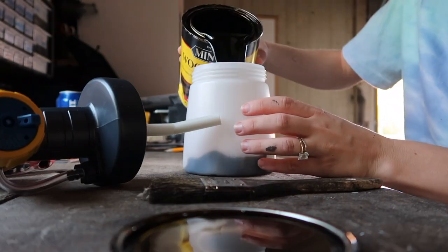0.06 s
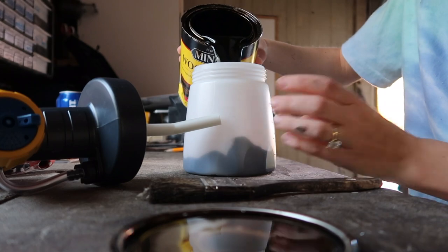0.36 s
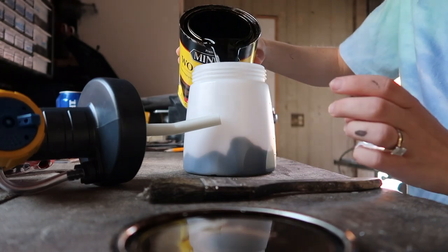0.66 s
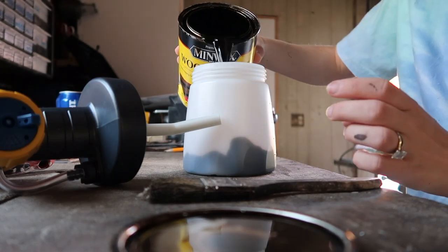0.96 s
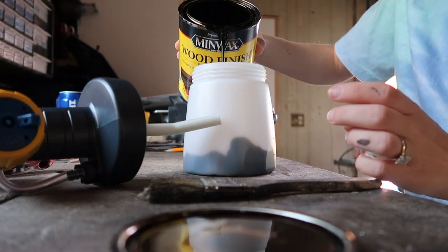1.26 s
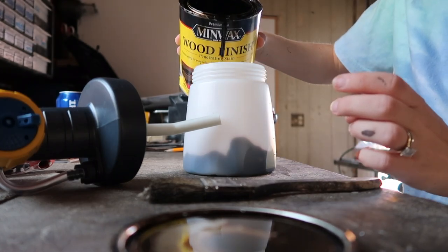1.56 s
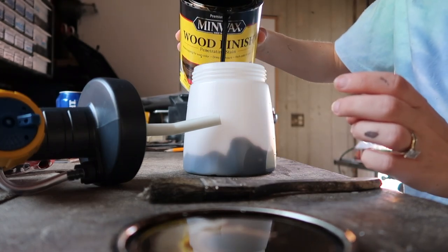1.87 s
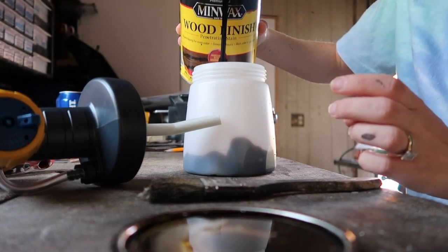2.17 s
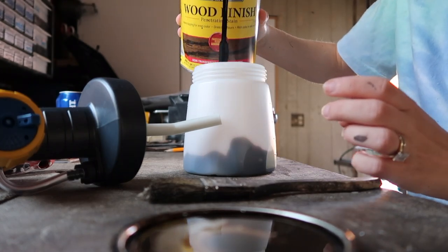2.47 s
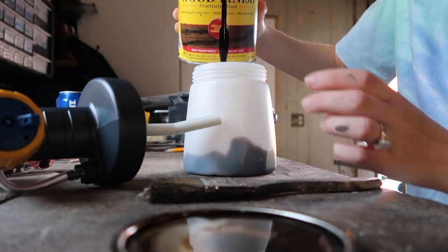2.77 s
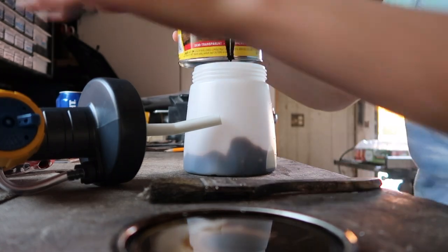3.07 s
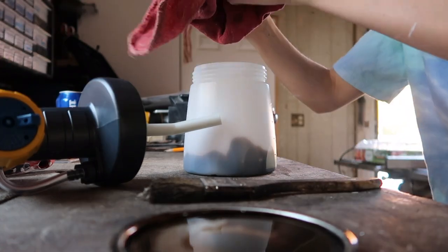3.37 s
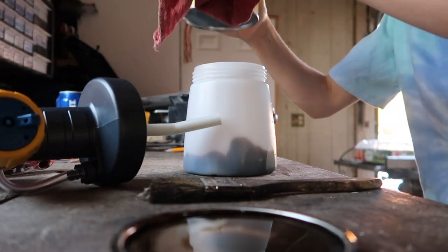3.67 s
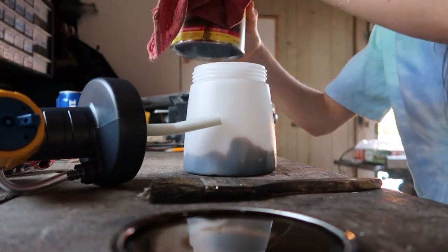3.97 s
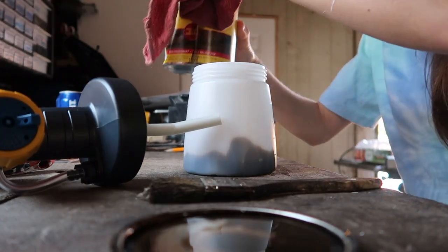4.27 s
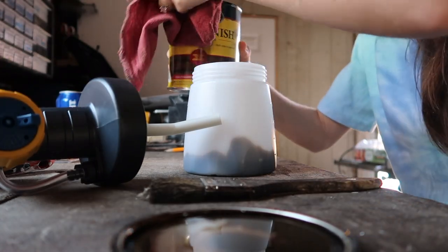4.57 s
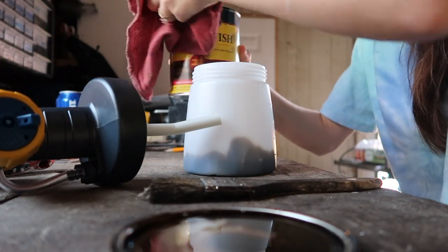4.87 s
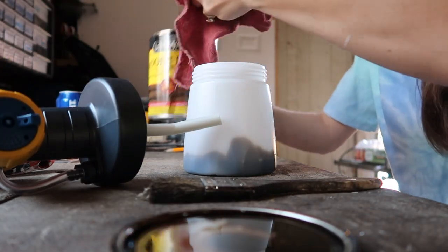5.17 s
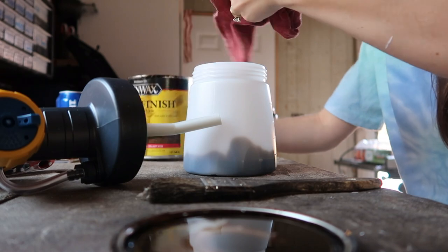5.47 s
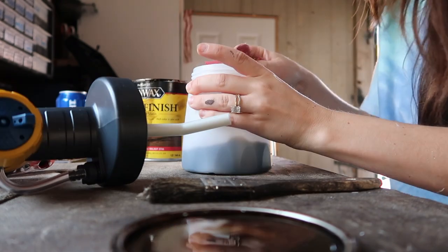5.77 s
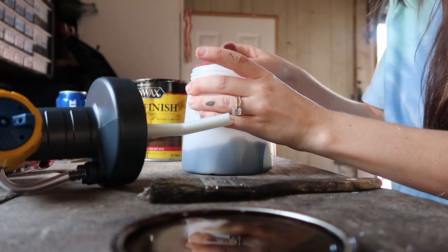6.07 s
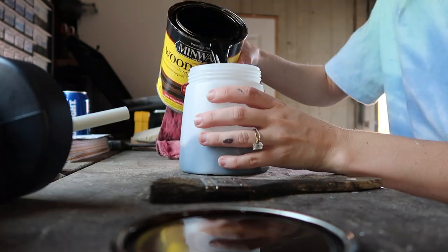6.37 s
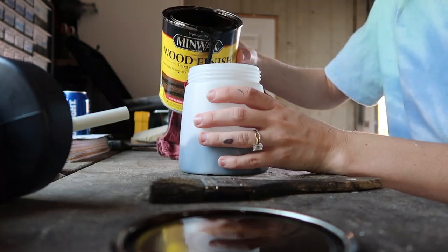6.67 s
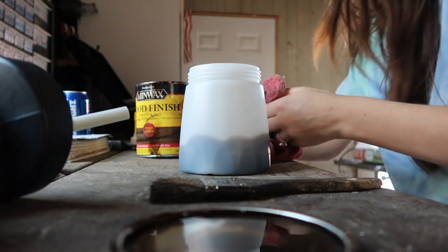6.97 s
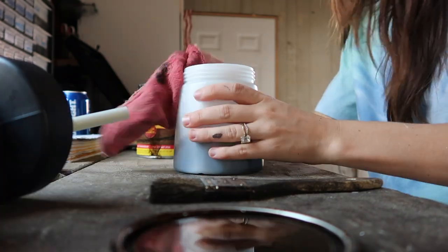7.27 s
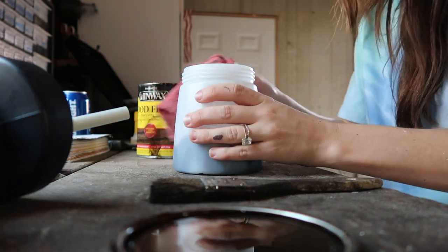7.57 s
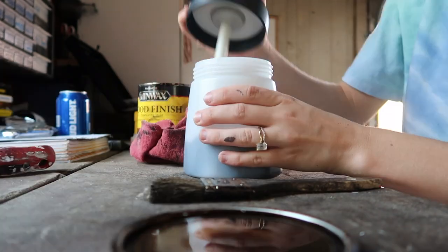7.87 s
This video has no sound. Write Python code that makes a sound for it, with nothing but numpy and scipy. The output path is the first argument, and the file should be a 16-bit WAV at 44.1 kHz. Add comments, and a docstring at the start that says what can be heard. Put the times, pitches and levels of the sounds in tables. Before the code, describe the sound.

Close up in a small, faintly humming workshop, sparse drips, bubbles and plastic ticks mark a very quiet pour into a cup. Soft cloth wiping follows, then a sharp knock of a can on the workbench. A brief, livelier pour bubbles and taps in the cup, things knock down on the bench with a slight rattle, and rag strokes and dull handling rumble finish.

```python
"""Pouring wood stain at a workbench

A small humming workshop, a stereo microphone close to the bench. Stain runs almost silently from a tin
can into a plastic sprayer cup: a few bubbles ring, and taps sound the cup's wall and the air inside.
A rag wipes the can, which is set down with a knock. Time jumps ahead several times: the rag rubs the
cup, a second pour gurgles, the can and the sprayer knock on the bench and set it ringing."""
import sys
import numpy as np
from scipy import signal
from scipy.fft import rfft, irfft, next_fast_len
from scipy.io import wavfile
from scipy.ndimage import map_coordinates

SR = 44100
rng = np.random.default_rng(int(sys.argv[2]) if len(sys.argv) > 2 else 0)


def transcribe(signal):
    """Save signal, clipped to [-1, 1], as a 16-bit WAV file at the path in sys.argv[1]."""
    frames = np.atleast_2d(signal).T
    limited = np.clip(frames, -1, 1)
    pcm = np.round(limited * 32767).astype(np.int16)
    wavfile.write(sys.argv[1], SR, pcm)


N = 353241
TIME = np.arange(N) / SR
AGE = TIME[:SR // 2]   # seconds since a short sound began


def from_db(db):
    """Decibels to gain."""
    return 10 ** (np.asarray(db) / 20)


def rms_one(x):
    """Scale to rms 1."""
    return x / np.sqrt(np.mean(x ** 2) + 1e-20)


def peak_one(x):
    """Scale to peak 1."""
    return x / (np.abs(x).max() + 1e-20)


def at_hz(points, hz):
    """Read (Hz, value) rows on a log-frequency axis."""
    f, value = np.transpose(points)
    return np.interp(np.log(np.maximum(hz, 1)), np.log(f), value)


def cut(x, hz, kind, order=2):
    """Butterworth filter."""
    sos = signal.butter(order, np.clip(hz, 10, .45 * SR), kind, fs=SR, output="sos")
    return signal.sosfilt(sos, x)


def fade(t60):
    """Free decay of a vibration, 60 dB in t60 seconds."""
    return from_db(-60 * AGE / t60)


def burst(t60):
    """A puff of white noise that dies away."""
    return rng.standard_normal(len(AGE)) * fade(t60)


def ring(modes):
    """A struck body of (Hz, dB, t60) modes: every blow gives each mode a strength of its own."""
    strengths = from_db(1.5 * rng.standard_normal(len(modes)))
    return sum(strengths[k] * from_db(db) * fade(t60) * np.sin(2 * np.pi * hz * AGE) * (-1) ** k
               for k, (hz, db, t60) in enumerate(modes))


def dying_noise(rows):
    """Countless close modes: half-octave noise bands from (Hz, dB, t60) rows, each dying at its rate."""
    rows, edges = np.array(rows), 90 * 2 ** np.arange(0, 7.6, .5)
    out, settle = 0, 2048
    for low, high in zip(edges, edges[1:]):
        hz = np.sqrt(low * high)
        band = cut(rng.standard_normal(len(AGE) + settle), [low, high], "band", order=3)[settle:]
        out = out + band * from_db(at_hz(rows[:, :2], hz)) * fade(at_hz(rows[:, ::2], hz))
    return out


def resonate(x, resonances):
    """A sound together with the (Hz, width Hz, dB) resonances that it excites."""
    return x + sum(from_db(db) * signal.lfilter(*signal.iirpeak(hz, hz / width_hz, fs=SR), x)
                   for hz, width_hz, db in resonances)


def drift(rate_hz):
    """A random wander of rms 1."""
    knots = rng.standard_normal(4096)
    return rms_one(map_coordinates(knots, [TIME * rate_hz], order=1, mode="wrap"))


def grains(per_s, spread_db):
    """Clicks at random times, most of them small."""
    size = from_db(spread_db * np.minimum(rng.exponential(1, N), 3)) * rng.choice([-1, 1], N)
    return (rng.random(N) < per_s / SR) * size


# Each entry: a moment in seconds at which time jumps ahead.
TIME_JUMPS = [5.671, 6.172, 6.839, 7.21]


def add(track, s, sound):
    """Mix a short sound into a track at time s; it ends where time next jumps ahead."""
    start = max(round(s * SR), 0)
    end = min([round(jump * SR) for jump in TIME_JUMPS if jump > s] + [N, start + len(sound)])
    track[start:end] += sound[:end - start]


def movements(rows, attack_s, release_s, swell_db):
    """Gain over time for (start, length, dB) rows: each sets in, swells or sags, and dies away."""
    gain = np.zeros(N)
    for start, length, db in rows:
        progress = np.clip((TIME - start) / length, 0, 1)
        held = from_db(db + swell_db * (progress - .5))
        outside = np.maximum(start - TIME, 0) / attack_s + np.maximum(TIME - start - length, 0) / release_s
        same_span = np.searchsorted(TIME_JUMPS, TIME) == np.searchsorted(TIME_JUMPS, start + length / 2)
        gain = np.maximum(gain, held * np.exp(-np.minimum(outside, 20)) * same_span)
    return gain


# Stereo width at the microphone. Each row: frequency in Hz, side minus mid in dB.
STEREO_WIDTH = [(60, -36), (110, -26.5), (200, -14.5), (380, -7.5), (700, -8.5), (1290, -6), (2380, -10.5),
                (4400, -4), (8120, 5), (15000, 13.5)]


def noise(colour):
    """Diffuse stereo noise of a given spectrum, wider in the treble; its middle has rms 1."""
    size = next_fast_len(N)
    hz = np.arange(size // 2 + 1) * SR / size
    mid, side = rfft(rng.standard_normal((2, size))) * from_db(at_hz(colour, hz))
    mid = irfft(mid, size)[:N]
    side = irfft(side * from_db(at_hz(STEREO_WIDTH, hz)), size)[:N]
    return np.array([mid + side, mid - side]) / mid.std()


# Room tone all around the microphone. Each row: frequency in Hz, relative density in dB.
ROOM_COLOUR = [(20, -21), (36, -14), (52, 2.5), (66, 0), (85, -4.5), (200, -8), (350, -13.5), (700, -20),
               (1400, -25), (2900, -25), (5000, -34.5), (8000, -43), (11000, -56.5), (15000, -64.5)]
# The workshop's hum. Each row: frequency in Hz, rms level in dB.
HUM_TONES = [(59.2, -53), (118.4, -51), (199.2, -62.5)]


def room_tone(noise_db=-44.0, waver_db=2.0, wander_rad=0.52):
    """Steady low noise under a hum that wavers in level and phase."""
    out = from_db(noise_db) * noise(ROOM_COLOUR)
    for hz, db in HUM_TONES:
        amplitude = np.sqrt(2) * from_db(db + waver_db * drift(5.6))
        out += amplitude * np.sin(2 * np.pi * hz * TIME + wander_rad * drift(6.4))
    return out


def bubble(hz, t60, rise=0.077, swell_cycles=1.0):
    """A bubble swells within a cycle or so and rings, its pitch rising as it nears the surface."""
    pitch = hz * (1 + rise * np.minimum(AGE / t60, 1))
    swell = 1 - np.exp(-AGE * hz / swell_cycles)
    return peak_one(np.sin(2 * np.pi * np.cumsum(pitch) / SR) * fade(t60) * swell)


def stray_bubbles(flow, per_s=45, low_hz=1078, high_hz=3370, splat_db=-3, count=1024):
    """Rows of lesser bubbles at random, as loud as the flow allows; the faintest are left out."""
    when, pitch = rng.random((2, count))
    over_flow_db = 6.5 + 2.5 * rng.standard_normal(count)
    starts = (np.arange(count) + when) / per_s
    levels = over_flow_db + 20 * np.log10(np.interp(starts, TIME, flow, right=0) + 1e-9)
    pitches = low_hz * (high_hz / low_hz) ** pitch
    return [(s, db, hz, splat_db) for s, db, hz in zip(starts, levels, pitches) if db > -56]


def in_cup(x, bounce_db, bounce_t60):
    """Sound made inside the cup bounces between its walls on the way to the microphone."""
    response = from_db(bounce_db) * burst(bounce_t60)
    response[0] = 1
    return signal.fftconvolve(x, response)[:N] / np.sqrt(np.sum(response ** 2))


# Bubbles that stand out, down in the cup; the row at 1.573 s is instead a bright 3 kHz ping as the can's rim
# touches the cup. Each row: start in seconds, level in dB, pitch in Hz, splat against the bubble in dB.
CLEAR_BUBBLES = [(0.1533, -35.5, 1540, -8), (.226, -44, 790, -2), (0.2855, -30.5, 3720, -7),
                 (.287, -40, 935, -8), (0.354, -37, 1920, 5.5), (0.382, -18.5, 3240, -8.5),
                 (.466, -38, 3680, -7), (.485, -34, 1810, -2), (0.49, -33.5, 3020, -9),
                 (.569, -43, 2200, 1), (.59, -44, 3370, -9), (.6317, -40.5, 884, 2.5),
                 (1.2124, -34.5, 4370, -7), (1.573, -24, 3020, -8), (1.593, -44, 1460, -7),
                 (1.662, -44, 4200, 2), (2.463, -25.5, 1537, 1), (2.56, -36, 1600, -8),
                 (2.572, -36.5, 1600, -2), (3.2692, -25.5, 804, -15), (6.215, -36, 1960, -4.5),
                 (6.258, -44, 4230, 6), (6.272, -25.5, 2030, -9), (6.273, -31.5, 2900, -4),
                 (6.312, -43, 3200, -2), (6.324, -43, 4000, 1), (6.358, -41, 2400, -2),
                 (6.371, -35, 1360, 1.5), (6.39, -33.5, 1970, -9), (6.397, -42, 3830, -6),
                 (6.42, -31, 4000, -8), (6.435, -24.5, 4770, -2), (6.441, -37, 4800, -1),
                 (6.467, -27.5, 1900, -15), (6.475, -37, 4150, -3), (6.488, -36, 3730, -9),
                 (6.507, -32, 2070, -8), (6.543, -32, 3450, -8), (6.553, -37, 3200, -7),
                 (6.554, -35.5, 1930, -1), (6.568, -43, 3900, -2), (6.579, -40, 2250, -10),
                 (6.593, -39, 2200, -7), (6.611, -33.5, 2100, -6), (6.637, -35, 1780, -5),
                 (6.666, -36, 3170, -7), (6.672, -29, 1620, 1), (6.68, -33, 1470, -7),
                 (6.691, -43, 3490, -2), (6.692, -34, 1500, -4)]


def bubbles(flow, t60_at_1khz=0.043, splat_t60=0.034):
    """Single bubbles, each born with a wet splat; the higher ones die sooner."""
    out = np.zeros(N)
    for s, db, hz, splat_db in CLEAR_BUBBLES + stray_bubbles(flow):
        t60 = t60_at_1khz * (1000 / hz) ** 0.42
        splat = peak_one(cut(burst(splat_t60), [hz * 0.53, hz * 1.15], "band", order=3))
        add(out, s, from_db(db) * (bubble(hz, t60) + from_db(splat_db) * splat))
    return in_cup(out, bounce_db=-26.0, bounce_t60=.028)


def fizz(ring_cycles=18):
    """Tiny bubbles burst at random; the smaller they are, the higher and shorter they ring."""
    out, pitches = np.zeros(N), np.geomspace(1350, 4600, 32)
    pops = grains(per_s=600, spread_db=8.5)
    pitch_index = rng.integers(0, len(pitches), N)
    for k, hz in enumerate(pitches):
        radius, angle = from_db(-60 * hz / (ring_cycles * SR)), 2 * np.pi * hz / SR
        resonator = [0, np.sin(angle)], [1, -2 * radius * np.cos(angle), radius ** 2]
        out += np.sqrt(hz) * signal.lfilter(*resonator, pops * (pitch_index == k) + 1e-18)
    return rms_one(cut(out, 4600, "low"))


def crackle():
    """Thin films of stain snap, each within a cycle or two."""
    return rms_one(cut(grains(per_s=400, spread_db=9.5), [1200, 4600], "band", order=3))


# Runs of stain into the cup, at close range. Each row: start and length in seconds, level in dB.
STAIN_RUNS = [(.24, 0.21, -62), (.458, 0.053, -48.5), (.53, 0.066, -54.5), (1.15, 0.6, -61),
              (2.15, 0.36, -60), (6.28, 0.11, -47.5), (6.415, 0.079, -46), (6.545, 0.14, -51.5)]
# The cup colours the stream. Each row: centre and width in Hz, gain in dB.
STREAM_RESONANCES = [(1500, 220, 6), (2100, 140, 3), (3150, 200, -4.5), (4000, 350, -7)]


def pour(crackle_db=-1):
    """The stream fizzes, crackles and sheds single bubbles, all inside the cup."""
    flow = movements(STAIN_RUNS, attack_s=0.011, release_s=0.034, swell_db=-1)
    froth = resonate(fizz() + from_db(crackle_db) * crackle(), STREAM_RESONANCES)
    stream = flow * rms_one(in_cup(froth, bounce_db=-20.5, bounce_t60=0.042))
    return stream + bubbles(flow)


# The air in the empty cup. Each row: frequency in Hz, level in dB, t60 in seconds.
CUP_AIR_MODES = [(541.5, 5, 0.11), (618, 2, 0.052), (649, -1.5, 0.072)]


def air_note(s, rise_per_s=0.013):
    """The cup's hollow note at time s; it climbs steadily over the scene, as in a filling cup."""
    return ring([(hz * (1 + rise_per_s * s), level, t60) for hz, level, t60 in CUP_AIR_MODES])


# The cup's plastic wall and its base. Each row: frequency in Hz, level in dB, t60 in seconds.
CUP_WALL_MODES = [(795, 1.5, 0.047), (970, 11.5, 0.0091), (1302, 2.5, 0.065), (1600, -1.5, 0.098),
                  (2057, 0.5, 0.076), (2460, -7, 0.024), (3100, 4.5, 0.046), (3680, 7, 0.043),
                  (4310, 6.5, 0.048), (5000, 4, 0.032), (5700, -22, 0.036)]
CUP_BASE_MODES = [(198.4, -4.5, 0.16), (331, -3, 0.094), (480, -4, 0.039)]
# The can's rim or a slug of stain strikes the cup, near the microphone.
# Each row: start in seconds, peak in dB, brightness in Hz, thump and air note gains in dB.
CUP_TAPS = [(0.3544, -33, 6000, -10, -13), (0.4547, -30, 7040, -23, -31), (1.5729, -27, 2400, -16, -10.5),
            (1.594, -35, 3000, -28, -30), (2.4624, -20, 2300, -2.5, -18), (2.558, -25.5, 1700, 4.5, -10),
            (2.745, -36.5, 1500, -7, -12), (3.262, -30, 2000, -3.5, -9), (6.4138, -23, 2580, -39, -14),
            (6.434, -25.5, 4600, -27, -26), (6.456, -17.5, 1600, -48, -9), (6.476, -26.5, 2030, -34, 2),
            (6.636, -30.5, 1600, -22, -8), (6.669, -31, 2000, -28, -11), (6.692, -32, 2000, -24, -9)]


def cup_taps(crack_db=11.0, crack_t60=0.084):
    """Each blow cracks and rings the plastic wall at its own brightness, and sounds the air and base."""
    out = np.zeros(N)
    for s, db, bright_hz, thump_db, air_db in CUP_TAPS:
        hiss = cut(rng.standard_normal(len(AGE)), [350, 6500], "band")
        crack = from_db(crack_db) * hiss * fade(crack_t60)
        wall = peak_one(cut(ring(CUP_WALL_MODES) + crack, bright_hz, "low"))
        hollow = from_db(air_db) * air_note(s)
        thump = from_db(thump_db) * ring(CUP_BASE_MODES)
        add(out, s, from_db(db) * peak_one(wall + hollow + thump))
    return out


# Dry ticks and wet snaps, close by. Each row: start in seconds, peak in dB, low and high edge in Hz.
SNAPS = [(.3548, -39.5, 6000, 12400), (.4565, -34, 3200, 6130), (0.4595, -29.5, 3500, 5900),
         (1.574, -20.5, 1100, 3600), (2.4635, -30.5, 3600, 4840), (2.625, -39, 8000, 13100),
         (3.153, -40.5, 8040, 13000), (3.2619, -18.5, 1600, 5340), (3.2624, -24, 4900, 5700),
         (3.2617, -38, 7000, 12000), (3.2653, -21, 1830, 5700), (3.27, -25.5, 1500, 4230),
         (3.2935, -36, 3500, 5950), (3.3327, -30, 1790, 5000), (6.4559, -13.5, 690, 1750),
         (7.1287, -21.5, 1670, 2950)]


def ticks(t60=0.0053):
    """Each snap is a few milliseconds of noise in one band."""
    out = np.zeros(N)
    for s, db, low_hz, high_hz in SNAPS:
        add(out, s, from_db(db) * peak_one(cut(burst(t60), [low_hz, high_hz], "band", order=5)))
    return out


# The can's rim. Each row: frequency in Hz, level in dB, t60 in seconds.
RIM_MODES = [(1400, -10, .1), (2131, -9, .14), (2930, -4, 0.22), (3060, -3, 0.18), (3160, 1, .08),
             (3876, -5, .1)]
# The rim touches the cup. Each row: start in seconds, peak in dB.
RIM_PINGS = [(1.5733, -32), (2.4635, -42)]


def rim_pings():
    """The thin metal rim rings on after a touch."""
    out = np.zeros(N)
    for s, db in RIM_PINGS:
        add(out, s, from_db(db) * peak_one(ring(RIM_MODES)))
    return out


# Hands at work near the microphone. Each row: start and length in seconds, level in dB.
HAND_MOVES = [(1.92, 0.096, -45), (2.38, 0.72, -44.5), (5.87, 0.24, -48.5), (6.85, 0.13, -38),
              (7.268, 0.05, -35), (7.56, 0.28, -43), (7.81, 0.22, -38.5)]
# Their rumble. Each row: frequency in Hz, relative density in dB.
HANDLING_COLOUR = [(30, -3.5), (70, 4.5), (130, 12), (200, -2.5), (300, -7), (600, -29), (1200, -32.5),
                   (3000, -67)]


def handling():
    """Hands and arms shift things on the bench with a dull rumble."""
    return movements(HAND_MOVES, attack_s=0.025, release_s=0.02, swell_db=0) * noise(HANDLING_COLOUR)


# Big gulps of air at the cup.
# Each row: start in seconds, level in dB, pitch in Hz, t60 in seconds, relative after-ring in dB.
GULPS = [(2.4625, -19, 586, 0.036, -9), (2.483, -32, 628, .04, -20), (2.513, -37, 557, .06, -7),
         (2.559, -30.5, 590, 0.05, -12), (5.858, -29, 530, 0.06, -23), (6.2326, -18, 576, 0.039, -18)]


def glugs(splat_db=-16, splat_t60=0.055):
    """A big bubble gulps and leaves the air in the cup ringing."""
    out = np.zeros(N)
    for s, db, hz, t60, after_db in GULPS:
        splat = from_db(splat_db) * peak_one(cut(burst(splat_t60), [350, 1100], "band"))
        gulp = bubble(hz, t60, rise=0.032, swell_cycles=1.6)
        hollow = from_db(after_db) * peak_one(air_note(s))
        add(out, s, from_db(db) * (gulp + hollow + splat))
    return out


def wandering_band(x, hz, width_hz, wander_share=0.026, block=512):
    """One band of a sound; its centre drifts, stepped block by block."""
    centre = hz * (1 + wander_share * drift(14))
    out, state = np.zeros_like(x), np.zeros((2, 2))
    for i in range(0, N, block):
        peak = signal.iirpeak(centre[i], hz / width_hz, fs=SR)
        out[:, i:i + block], state = signal.lfilter(*peak, x[:, i:i + block], zi=state)
    return out


# The hiss of cloth from close up. Each row: frequency in Hz, relative density in dB.
CLOTH_COLOUR = [(200, -6), (500, 1.5), (1100, -4.5), (1750, -4), (2300, -3.5), (2900, -4.5), (4000, -4),
                (5300, -10), (8500, -21), (11000, -36), (15000, -35)]


def rub(strokes, bands, catch_db, uneven_db):
    """Cloth drags under uneven pressure with a hiss and catching fibres; wandering bands stand out."""
    rasp = rms_one(cut(grains(per_s=800, spread_db=7.5), [2500, 5000], "band"))
    friction = from_db(uneven_db * drift(35)) * (noise(CLOTH_COLOUR) + from_db(catch_db) * rasp)
    out = friction + sum(from_db(db) * wandering_band(friction, hz, width_hz)
                         for hz, width_hz, db in bands)
    # the hand presses harder through each stroke
    pressure = movements(strokes, attack_s=0.011, release_s=0.03, swell_db=3)
    return pressure * out / out.mean(axis=0).std()


# Rag strokes, close and dry. Each row: start and length in seconds, level in dB.
CAN_STROKES = [(3.57, 0.364, -53), (3.98, 1.1, -57)]
CUP_STROKES = [(5.672, 0.12, -43.5), (5.88, 0.09, -45), (6.065, 0.14, -43.5), (7.255, 0.028, -45),
               (7.34, 0.17, -51), (7.49, 0.18, -47.5), (7.72, 0.25, -57)]
# Resonances that rubbing brings out and the grip shifts, plus a faint sheen of hiss near 14 kHz
# in the cup strokes. Each row: centre and width in Hz, gain in dB.
CAN_RUB_BANDS = [(2330, 150, 10.5), (3450, 160, 2), (4620, 370, 0.5)]
CUP_RUB_BANDS = [(1310, 91, 2), (1620, 130, 10.5), (1750, 130, 10), (2200, 170, 10), (3530, 340, 6),
                 (4320, 160, 4), (5960, 70, 0), (13900, 1400, -1)]


def rag():
    """The rag wipes the can softly, later scrubs the cup."""
    wipe = rub(CAN_STROKES, CAN_RUB_BANDS, catch_db=-20, uneven_db=2.0)
    scrub = rub(CUP_STROKES, CUP_RUB_BANDS, catch_db=-10, uneven_db=1.1)
    return wipe + scrub


# The bench, the can, and the bench's dense modes with the tools on it.
# Each row: frequency in Hz, level in dB, t60 in seconds.
BENCH_MODES = [(161, -1.5, 0.22), (224, -9, 0.28), (352.4, -1.5, .3), (391.4, -0.5, .2), (522, -8, 0.35),
               (554, -9.5, 0.15), (590, -4, .23), (652, -2.5, .21), (675, -4.5, .15), (727, -8, 0.23),
               (778, -5.5, 0.23), (877, -3, .14), (1120, -10, 0.24)]
CAN_MODES = [(1020, -13.5, 0.2), (1180, 6.5, .12), (1350, -1, 0.1), (1520, -10, 0.12), (1680, -1.5, 0.22),
             (1830, -5, 0.17), (2000, -10.5, 0.22), (2240, -4, 0.33), (2290, -12, 0.24), (2400, -6, 0.26)]
RATTLE_BANDS = [(128, -9, 0.18), (261, -9, 0.42), (525, -2.5, 0.14), (705, 2.5, 0.096), (1070, -5, 0.22),
                (1600, -14, 0.2), (2400, -26.5, 0.077), (3200, -47, .12), (5900, -62.5, 0.056)]
# Things put down near the microphone. Each row: start in seconds, level in dB, thud pitch in Hz, its
# t60 in seconds, bench ring in dB, its tilt in dB per octave, rattle and can ring gains in dB.
BENCH_KNOCKS = [(5.571, 3, 647, 0.0075, -24, -0.5, -27.5, -43.5),
                (6.91, 3.5, 660, 0.0076, -23.5, -0.5, -24, -43.5),
                (6.9535, -12, 423, 0.0048, -27, 0, -35, -47), (6.9888, -23, 700, 0.0056, -27, 0, -28, -36),
                (7.1279, -10, 1310, 0.013, -18.5, -1.5, -18, -28)]


def knocks(rattle_boost_db=20.0, overtone_db=-17, build_s=0.00042):
    """A short thud rings the bench, the can and loose tools; where it lands tilts the bench's modes."""
    out = np.zeros(N)
    for s, db, hz, t60, ring_db, tilt_db, tools_db, can_db in BENCH_KNOCKS:
        # the blow is two damped tones of steady pitch
        blow = bubble(hz, t60, rise=0) + from_db(overtone_db) * bubble(1.794 * hz, t60=0.022, rise=0)
        thud = cut(cut(blow, 2000, "low", order=4), 130, "high")
        modes = [(f, level + tilt_db * np.log2(f / 500), ring_s) for f, level, ring_s in BENCH_MODES]
        bench = from_db(ring_db) * ring(modes)
        rattle = from_db(rattle_boost_db + tools_db) * dying_noise(RATTLE_BANDS)
        can = from_db(can_db) * ring(CAN_MODES)
        build_up = 1 - np.exp(-AGE / build_s)
        add(out, s, from_db(db) * (thud + (bench + rattle + can) * build_up))
    return out


# Friction on the bench top. Each row: frequency in Hz, relative density in dB.
SLIDE_COLOUR = [(60, -29), (170, 7.5), (280, 0), (550, -4.5), (1000, -6), (1700, -6.5), (2300, -7),
                (2900, -9.5), (4500, -13), (8000, -48), (15000, -62)]
# The sliding cup. Each row: centre and width in Hz, gain in dB.
SLIDE_RESONANCES = [(239, 37, 2.5), (480, 100, -3), (690, 85, 1.5), (1297, 92, 6.5), (1734, 95, 8),
                    (2186, 86, 6), (2280, 98, 6)]
# Things shoved along the bench, close by.
# Each row: time in seconds, peak in dB, build-up and fade in seconds, brightness in Hz, boom in dB.
SHOVES = [(5.8905, -17, 0.003, 0.0087, 2100, -41), (7.269, -13.5, 0.0042, 0.011, 3600, -26.5)]


def scuffs(grain_db=1.5, boom_hz=330):
    """A brief rough slide rings the cup and ends in a bump that sounds the bench's low modes."""
    out = np.zeros(N)
    friction = noise(SLIDE_COLOUR).mean(axis=0) * from_db(grain_db * drift(400))
    for s, db, build_s, fade_s, bright_hz, boom_db in SHOVES:
        from_peak = np.maximum((s - TIME) / build_s, (TIME - s) / fade_s)
        slide = friction * np.exp(-np.minimum(from_peak, 20))
        out += from_db(db) * peak_one(cut(resonate(slide, SLIDE_RESONANCES), bright_hz, "low"))
        add(out, s, from_db(boom_db) * peak_one(cut(ring(BENCH_MODES), boom_hz, "low")))
    return out


# Surfaces near the microphone. Each row: delay in seconds, level in dB.
NEAR_ECHOES = [(.0042, -21), (.0095, -40), (0.018, -23), (0.027, -41)]
# The small room's diffuse tail. Each row: frequency in Hz, relative level in dB, t60 in seconds.
ROOM_TAIL = [(150, 5.5, 0.56), (606, -0.5, 0.4), (1500, -12.5, 0.53), (4000, -8.5, 0.35), (12000, 3, 0.14)]


def workshop_response(tail_db, port_delay_samples=0.6):
    """Direct sound, a few near echoes and a diffuse tail that dies sooner in the treble; stereo."""
    tails = np.array([dying_noise(ROOM_TAIL), dying_noise(ROOM_TAIL)])
    tail_ahead, tail_across = from_db(tail_db) * tails * (1 - np.exp(-AGE / 0.0022))
    direct = np.zeros(len(AGE))
    direct[0] = 1
    for s, db in NEAR_ECHOES:
        direct[round(s * SR)] += from_db(db)
    # two close microphone ports: their difference follows the slope of the pressure
    side = port_delay_samples * np.gradient(np.pad(direct + tail_across, 2))
    mid = np.pad(direct + tail_ahead, 2)
    return np.array([mid - side, mid + side])


def workshop(x, tail_db):
    """Sound in the room; all ringing stops short where time jumps ahead."""
    response, out = workshop_response(tail_db), np.zeros((2, N))
    edges = [0] + [round(s * SR) for s in TIME_JUMPS] + [N]
    for a, b in zip(edges, edges[1:]):
        out[:, a:b] = signal.fftconvolve(x[None, a:b], response, axes=1)[:, :b - a]
    return out


def scene():
    """Everything on the bench, heard from close by."""
    at_cup = workshop(pour() + glugs() + cup_taps() + rim_pings() + ticks(), tail_db=-41.0)
    on_bench = workshop(knocks() + scuffs(), tail_db=-38.0)
    return at_cup + on_bench + rag() + room_tone() + handling()


def gain_control(x, threshold_db=-8.5, share=0.27, attack_s=0.016, release_db_per_s=13.5):
    """A loud knock pulls the gain down by a share of its excess; the gain then creeps back."""
    level_db = 20 * np.log10(np.abs(x).max(axis=0) + 1e-9)
    excess_db = np.maximum(level_db - threshold_db, 0)
    recovery = release_db_per_s * TIME
    held_db = np.maximum.accumulate(share * excess_db + recovery) - recovery
    pole = np.exp(-1 / (attack_s * SR))
    return x * from_db(-signal.lfilter([1 - pole], [1, -pole], held_db))


def record(dry):
    """Behind the microphone, the loudest knocks duck the gain and are rounded off; the top is cut."""
    ducked = gain_control(dry)
    rounded = ducked / (1 + ducked ** 4) ** .25
    top_cut = signal.ellip(10, .1, 70, 15400, fs=SR, output="sos")
    return signal.sosfilt(top_cut, rounded)


dry = scene()
out = record(dry)
transcribe(out)
```